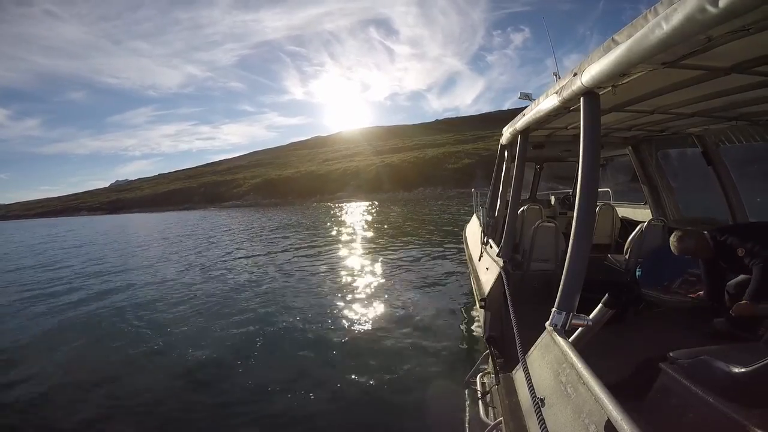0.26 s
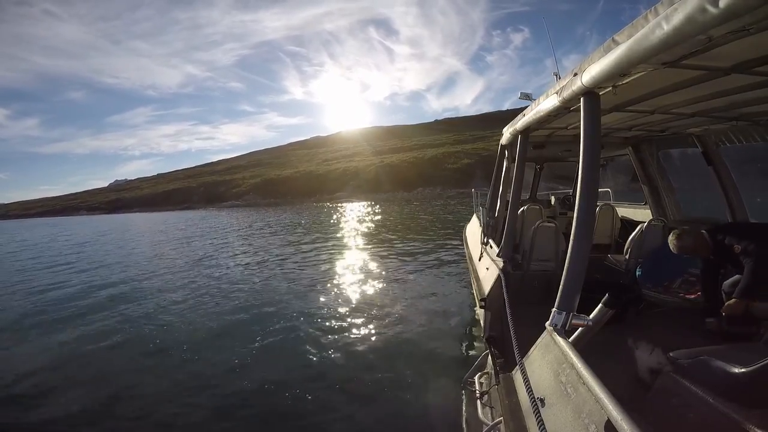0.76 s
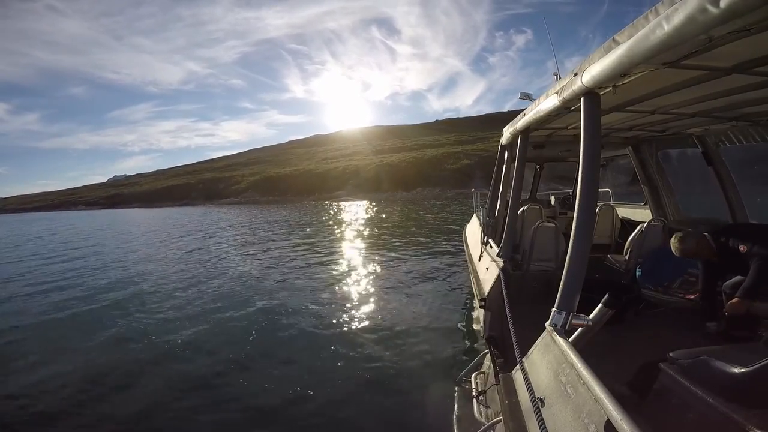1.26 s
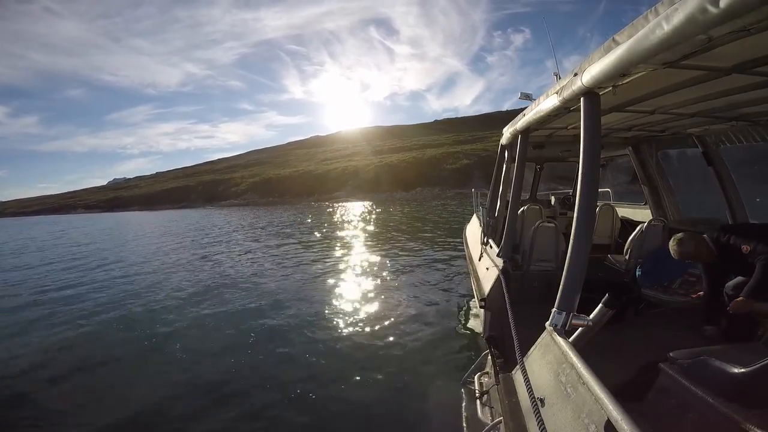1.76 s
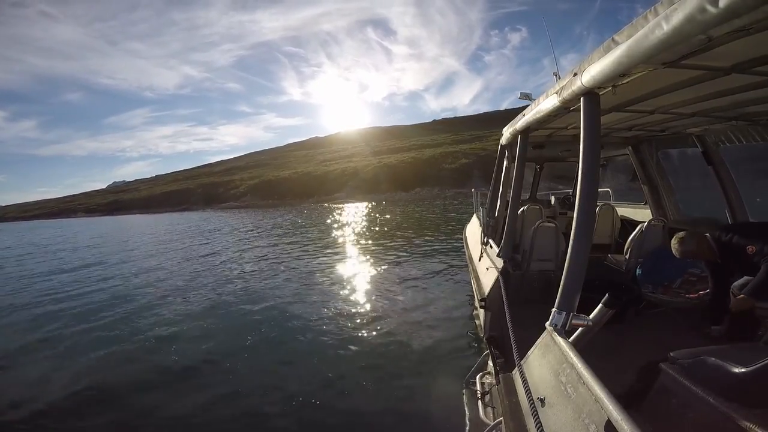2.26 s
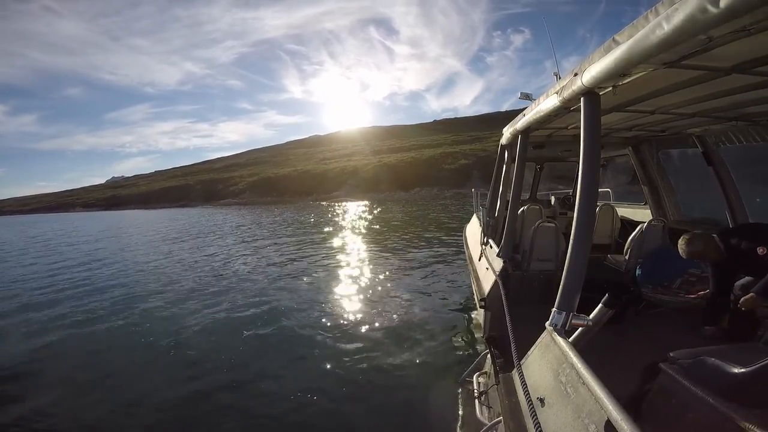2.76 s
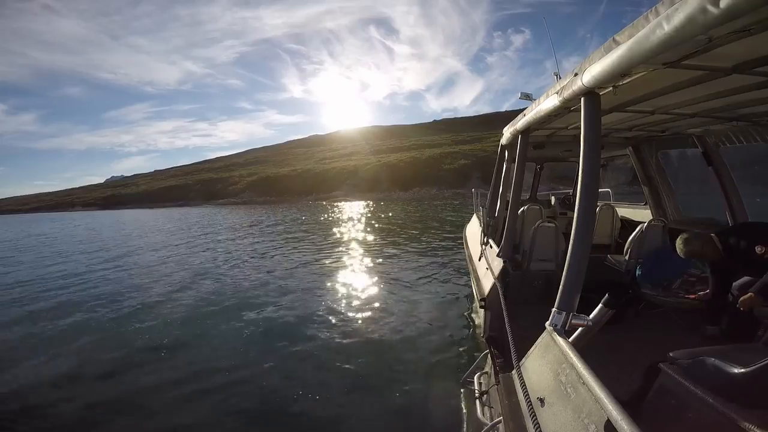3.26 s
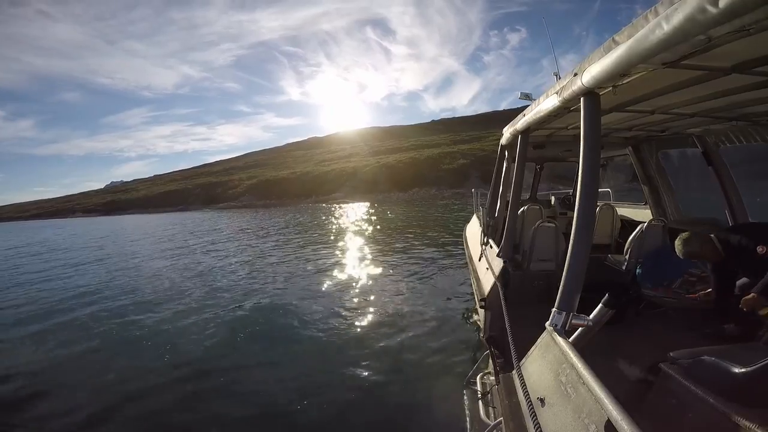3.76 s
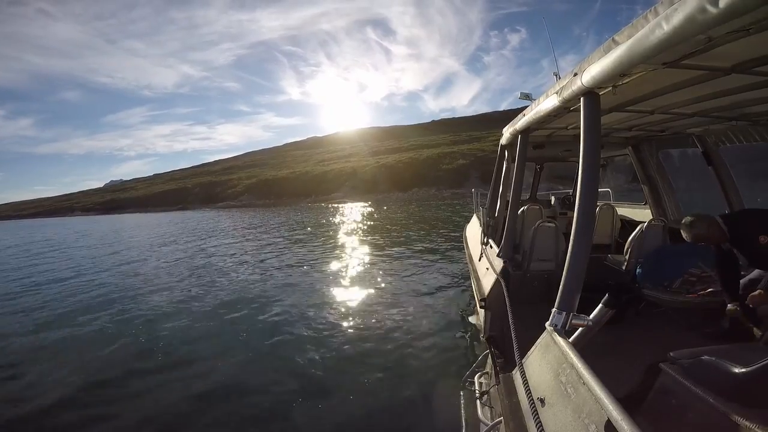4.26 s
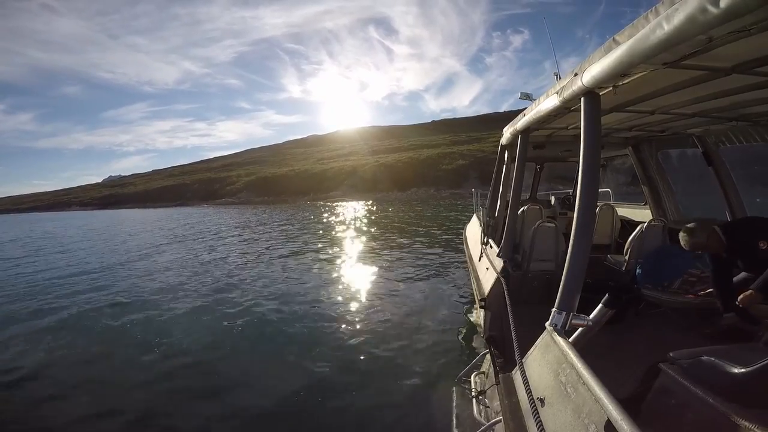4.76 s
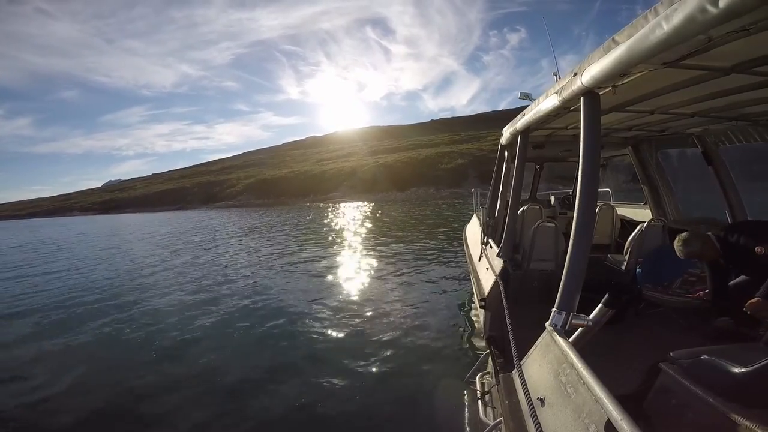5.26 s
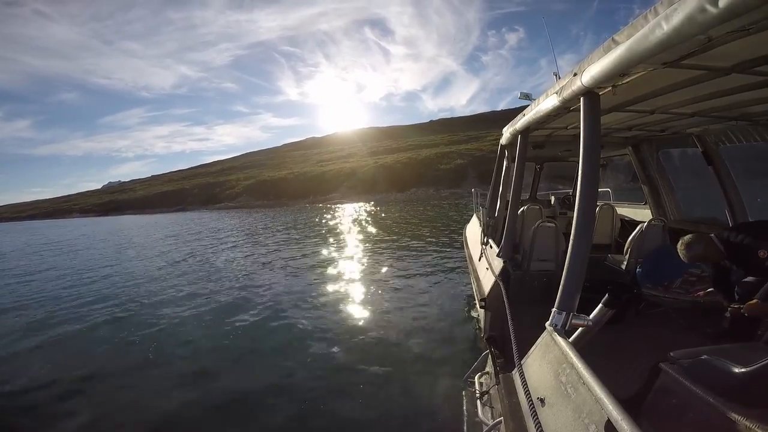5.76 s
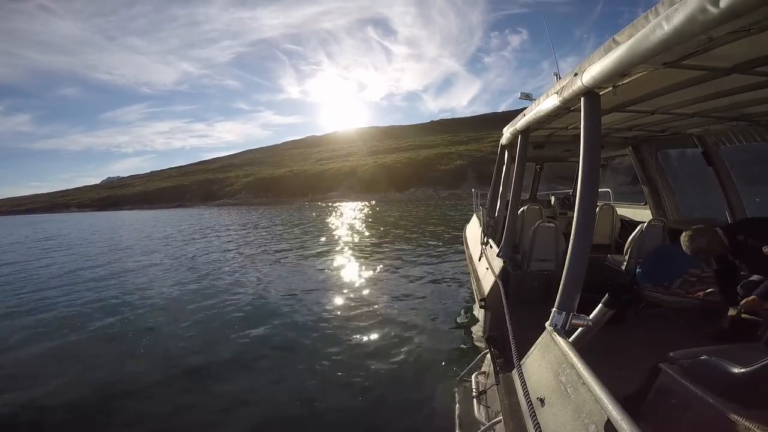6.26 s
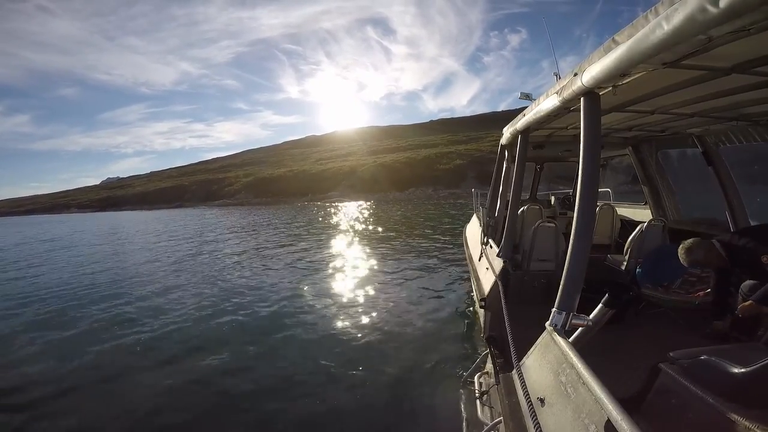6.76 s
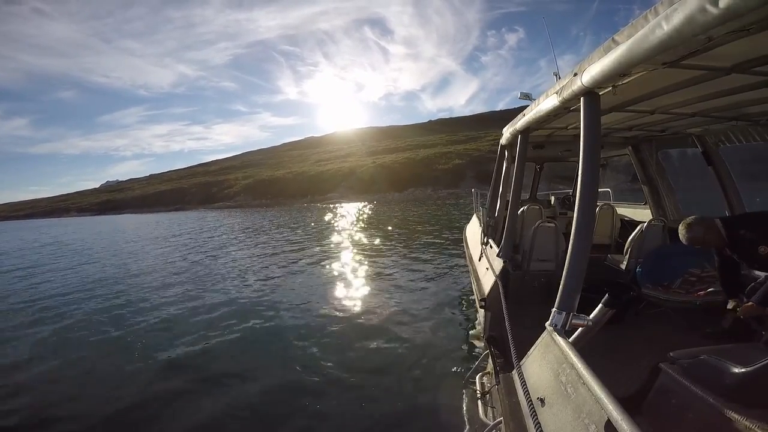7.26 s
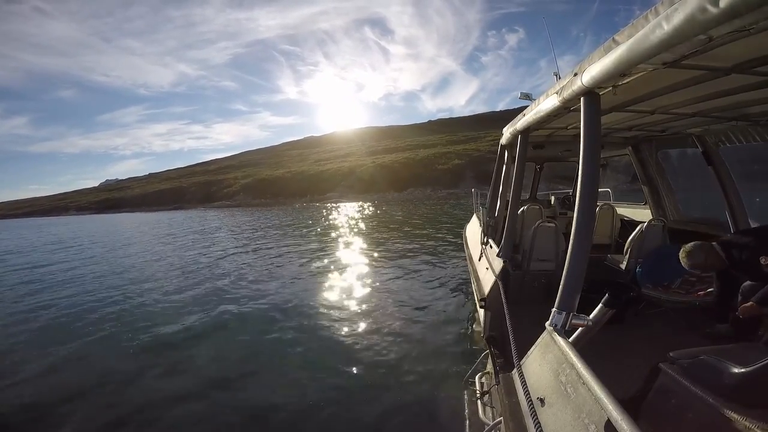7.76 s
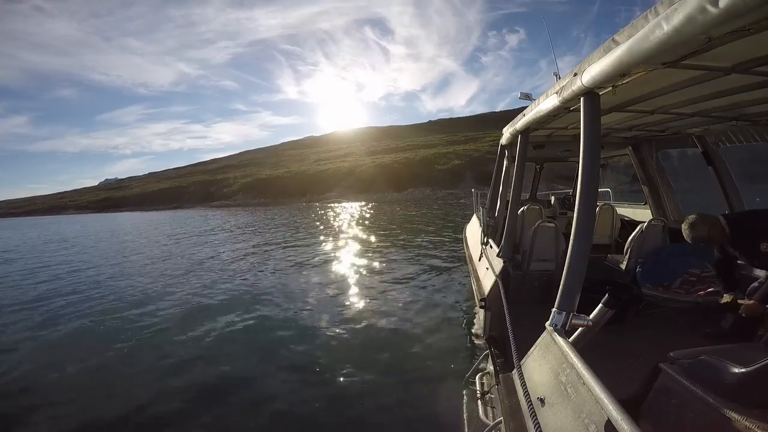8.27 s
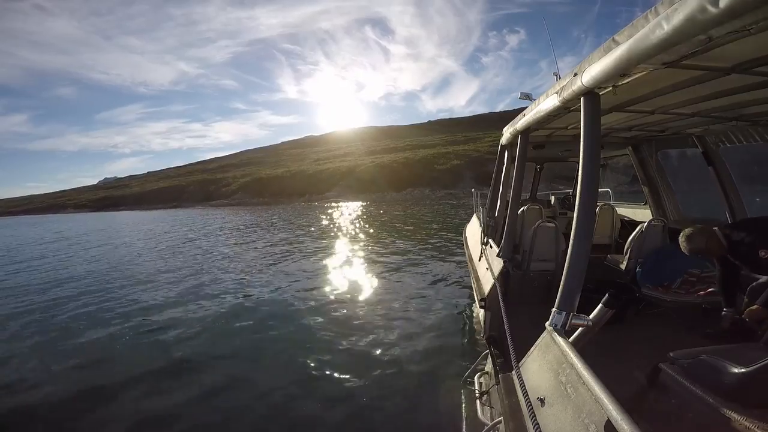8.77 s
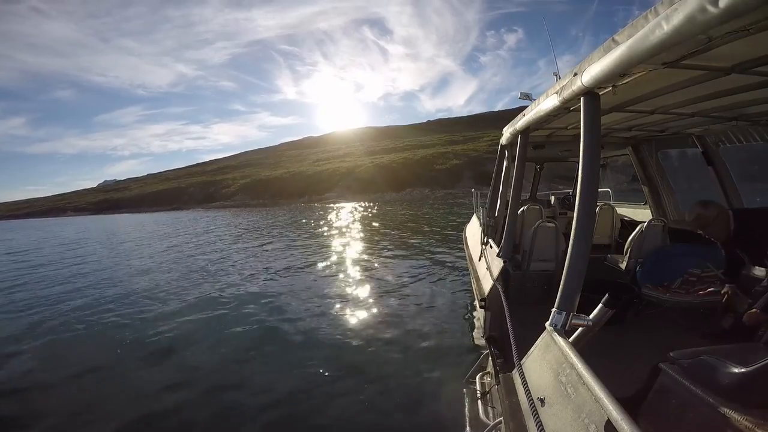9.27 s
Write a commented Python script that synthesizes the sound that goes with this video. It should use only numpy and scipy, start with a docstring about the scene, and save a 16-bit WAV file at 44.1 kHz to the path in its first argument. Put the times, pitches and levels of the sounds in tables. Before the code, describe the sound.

Someone shifts heavy gear aboard a drifting metal boat: scuffs, booming knocks and sharp clanks, with low rumble and soft lapping water.

```python
"""A low boom and a soft bed of water open the scene, with a scuff on deck and then a heavy thud.
An aluminium boat drifts on calm water while someone shifts things about: hard objects clack on the
plating, and heavy ones thud and ring the hollow hull. Wavelets and ripples plop under the side, and
rocking swings the lowest hull mode. Blows are shaped noise plus decaying sines, sent through the
plating's resonances; the boom is a wavering sine in a dull rumble, and the bed is coloured noise."""
import sys
import numpy as np
from scipy import signal
from scipy.fft import irfft, next_fast_len
from scipy.io import wavfile
from scipy.ndimage import uniform_filter1d

SR = 44100
rng = np.random.default_rng(int(sys.argv[2]) if len(sys.argv) > 2 else 0)


def digitize_waveform(pressure):
    """Quantize a signal to 16-bit integers and store it at the path in sys.argv[1].

    Rows of a 2-D input are taken as channels; values are limited to [-1, 1].
    """
    field = np.atleast_2d(pressure).T
    bounded = np.clip(field, -1, 1)
    quanta = np.round(bounded * 32767).astype(np.int16)
    wavfile.write(sys.argv[1], SR, quanta)


N = 420273
T = np.arange(N) / SR
# time since a blow (s); it starts below zero because contact may press a little early
AGE = T[:SR * 3 // 2] - .05

# heavy loads landing on the hull, levels before each layer's gain:
# t/s, burst level/dB, deep ring level/dB, scuff level/dB
LANDINGS = [(0.054, -16, -31, -8), (0.226, -8, -20, -13), (1.175, -24, -35.5, -33),
            (1.638, -25.5, -47, -25.5), (1.684, -14.5, -23.5, -24), (1.781, -12, -18, -24),
            (2.175, -23, -31, -29), (2.357, -29.5, -31, -24), (2.708, -9.5, -23, -13),
            (2.813, -26, -26, -28.5), (3.152, -18, -21.5, -27), (3.672, -35, -37.5, -36.5),
            (3.789, -40.5, -32.5, -38), (3.978, -16.5, -25.5, -25.5), (5.393, -32, -35.5, -34),
            (5.542, -13.5, -23.5, -24), (6.396, -15, -23, -26.5), (7.198, -25.5, -35.5, -31.5),
            (8.675, -35, -42, -36), (8.986, -15, -26.5, -20.5)]
LANDING_TYPICAL_DB = (-25, -41.5, -52)  # a typical landing scuff: middle, treble, top


def from_db(db):
    """Decibels to amplitude gain."""
    return 10 ** (np.asarray(db) / 20)


def rms_one(x):
    """Scale to unit rms."""
    return x / np.sqrt(np.mean(x ** 2) + 1e-20)


def at_hz(points, hz):
    """Read a table on a log-frequency axis."""
    f, value = np.transpose(points)
    return np.interp(np.log(hz + 1e-9), np.log(f), value)


def add(out, s, sound):
    """Mix in a blow that lands at time s, keeping its early pressing ahead of it."""
    i = int(min((s + AGE[0]) * SR, N - 1))
    out[max(i, 0):i + len(sound)] += sound[max(-i, 0):N - i]


def noise(spectrum, size):
    """Noise of a given colour: set magnitudes with random phases, rms 1."""
    hz = np.fft.rfftfreq(size, 1 / SR)
    random_phase = np.exp(2j * np.pi * rng.random(len(hz)))
    return rms_one(irfft(from_db(at_hz(spectrum, hz)) * random_phase, size))


def drift(rate):
    """Slow random wandering of rms 1: noise averaged twice over about 1/rate seconds."""
    step = 100  # samples between the slow points
    width = int(SR / rate / step) + 1
    slow = rng.standard_normal(N // step + 2)
    slow = uniform_filter1d(uniform_filter1d(slow, width), width)
    return np.interp(np.arange(N) / step, np.arange(len(slow)), rms_one(slow))


def swell(rise, t60):
    """Contact builds up over the rise time, then the vibration dies away by 60 dB per t60."""
    contact = .5 * (1 + np.tanh(AGE / max(rise, 1e-4)))
    decay = np.exp(-np.log(1000) * np.maximum(AGE, 0) / max(t60, 1e-2))
    return contact * decay


def burst(carrier, envelope):
    """Many crowded modes ringing under one envelope, with the envelope's own energy."""
    sound = carrier * envelope
    return sound * np.sqrt(np.sum(envelope ** 2) / np.sum(sound ** 2))


def plating(x):
    """Whatever shakes the plating takes on its ringing resonances, one after another."""
    # resonances of the plating: f/Hz, width/Hz, lift/dB
    resonances = [(615, 35, 4), (709, 30, 8), (925, 45, 4), (1094, 75, 7), (1461, 45, 7), (1600, 45, 5),
                  (1774, 35, 8), (2355, 130, 8), (2870, 90, 4), (4244, 80, 7), (4397, 70, 8),
                  (5600, 180, 9), (7000, 350, 5), (10400, 400, 6)]
    for hz, width, lift_db in resonances:
        ring = signal.lfilter(*signal.iirpeak(hz, hz / width, fs=SR), x + 1e-18)
        x = x + (from_db(lift_db) - 1) * ring
    return x


def ambience(level_db=-54, lapping_db=-68, sway_db=3.5):
    """A soft bed of water and air, lapping heard through the plating, and a thin electronic whine."""
    # water and air around the boat: f/Hz, relative level/dB per Hz
    bed_colour = [(35, -41), (60, -24), (74, -21.5), (187, -18), (206, -33.5), (242, -21.5), (368, -38.5),
                  (403, -35), (453, -40), (1120, -46), (1520, -46), (6120, -52.5), (15500, -68.5)]
    # water washing along the side, ahead of the plating: f/Hz, relative level/dB per Hz
    lapping_colour = [(150, -1), (270, 14), (450, -2.5), (700, -3), (1100, 0), (2300, -7), (5000, -16.5)]
    # faint electronic whine: centre f/Hz, rms level/dB
    whine_tones = [(6310, -83), (12620, -84)]
    bed = from_db(level_db) * noise(bed_colour, next_fast_len(N))[:N]
    wash = plating(noise(lapping_colour, next_fast_len(N))[:N])
    lapping = from_db(lapping_db + sway_db * drift(5)) * wash
    whine = 0
    for hz, db in whine_tones:
        phase = 2 * np.pi * np.cumsum(hz + 12 * drift(15)) / SR  # pitch wanders by 12 Hz rms
        whine = whine + np.sqrt(2) * from_db(db) * np.sin(phase)
    return bed + lapping + whine


def rocking():
    """Swing of the lowest mode: surges rise, hold and die back to a rest level that sags in lulls."""
    # rocking surges: t/s, level/dB, hold/s
    surges = [(0.05, -19.5, 0.17), (0.379, -21.5, .14), (1.675, -20.5, 0.77), (2.83, -23.5, 0.18),
              (3.79, -29, 0.073), (5.431, -19, 0.12), (6.49, -27, 0.054), (6.94, -27.5, 0.41),
              (9.115, -23, 0.38)]
    # lulls, when the lowest mode all but stops: centre t/s, half-length/s
    lulls = [(1.073, 0.049), (4.587, 0.22), (5.36, 0.044), (6.3, 0.14), (8.118, 0.1)]
    rest_db, lull_db = -34.5, -8
    surge_rise_s, surge_fall_db_per_s = 0.024, 72
    calm = sum(np.exp(-((T - s) / half) ** 2) for s, half in lulls)
    power = from_db(rest_db + lull_db * calm) ** 2
    for s, level_db, hold in surges:
        rise = .5 * (1 + np.tanh((T - s) / surge_rise_s))
        fall_db = surge_fall_db_per_s * np.maximum(T - s - hold, 0)
        power = power + (rise * from_db(level_db - fall_db)) ** 2
    return np.sqrt(power)


def boom(gain_db=0, waver_hz=0.9, flutter_db=1.1, rumble_db=-18):
    """The rocking keeps the lowest hull mode swinging, wrapped in a dull rumble."""
    # dull rumble around the lowest mode: f/Hz, relative level/dB per Hz
    rumble_colour = [(15, -20), (28, -14), (43, -9.5), (62, 0), (80, -16), (130, -33.5), (400, -68)]
    boom_hz = 43.1
    phase = 2 * np.pi * np.cumsum(boom_hz + waver_hz * drift(12.8)) / SR
    mode = np.sqrt(2) * from_db(flutter_db * drift(19)) * np.sin(phase)
    rumble = from_db(rumble_db) * noise(rumble_colour, next_fast_len(N))[:N]
    return from_db(gain_db) * rocking() * (mode + rumble)


def pocket(hz, t60=0.069, tail_db=-25, tail_t60=0.38):
    """A pocket of air squeezed between water and metal gives a short hollow plop."""
    # colour of a trapped air pocket: f/multiple of its pitch, relative level/dB per Hz
    pocket_colour = [(.12, -21), (.5, -8.5), (.8, -3), (1.099, 0.5), (1.4, -12.5), (1.75, -19.5),
                     (2.1, -28.5), (2.45, -24), (3.8, -58.5)]
    colour = np.array(pocket_colour) * [hz, 1]
    envelope = swell(.0012, t60) + from_db(tail_db) * swell(0.0064, tail_t60)
    return burst(noise(colour, len(AGE)), envelope)


def ripples(level_db=-68, per_s=24, spread_db=4.0, count=12):
    """Small ripples plop softly at random, each place along the hull at its own pitch."""
    out = 0
    for hz in np.geomspace(180, 1500, count):
        strength = from_db(spread_db * rng.uniform(-0.9, 1, N))
        ticks = (rng.random(N) < per_s / count / SR) * strength
        out = out + signal.oaconvolve(ticks, pocket(hz, t60=.12) / np.sqrt(hz))[:N]
    return from_db(level_db) * rms_one(out)


def by_force(rows, typical_db, follows):
    """Harder contacts lift middle, treble and top, each by its own share of the extra decibels."""
    typical, share = np.array(typical_db), np.array(follows)
    return [(s, *(typical + share * (level - typical_db[0]))) for s, level in rows]


def hull_ring(body_db, deep_db, rise=.006, scatter_db=1.62, detune=0.0077):
    """One blow rings the hull modes; the load on the plates shifts them a little each time."""
    # hull modes: nominal f/Hz, relative level/dB, t60/s
    hull_modes = [(86.65, -8, 0.98), (118.23, -3, 0.75), (152.43, -2, 0.9), (170.5, 3, .3),
                  (203, -3.5, 0.28), (237.7, 3.5, 0.29), (253.3, 0.5, 0.4), (304.6, -5, 0.33),
                  (321.3, -5, 0.14), (410, -16.5, 0.26), (501, -24.5, 0.24)]
    out = 0
    for hz, mode_db, t60 in hull_modes:
        # deep level below 160 Hz, body level above 220 Hz
        level_db = np.interp(hz, [160, 220], [deep_db, body_db])
        level_db = level_db + mode_db + scatter_db * rng.standard_normal()
        pitch = hz * (1 + detune * rng.standard_normal())
        tone = np.sin(2 * np.pi * (pitch * AGE + rng.random()))
        out = out + from_db(level_db) * swell(rise, t60) * tone
    return out


def partials(low_hz=900, high_hz=4500, t60=0.084, count=4):
    """The object itself rings briefly with a few notes that depend on where it is hit."""
    pitch, phase = rng.random((2, count, 1))
    hz = low_hz * (high_hz / low_hz) ** pitch
    notes = low_hz / hz * np.sin(2 * np.pi * (hz * AGE + phase))
    return swell(0.0024, t60) * np.sum(notes, axis=0)


def contacts(rows, rise, gain_db, treble_db, top_db, crack_db, crack_t60, tail_db, tail_t60,
             hull_db, rattle_db, object_db):
    """A short crack, the rattling wash of crowded plate modes, and a faint long ring below the treble."""
    # colour of a contact, ahead of its force: f/Hz, band level/dB
    contact_colour = [(200, 5), (330, -9.5), (460, -18), (650, -10.5), (1300, -6.5), (2000, -12.5),
                      (3000, 1.5), (4500, -4), (6500, -3.5), (8500, -2), (12000, -8.5), (15500, 6.5)]
    # decay of the wash: f/Hz, t60/s
    contact_decay = [(250, 0.53), (700, 0.16), (1800, 0.27), (5000, 0.23), (13000, 0.19)]
    out, edges = np.zeros(N), np.geomspace(200, 16000, 14)
    centres = np.sqrt(edges[1:] * edges[:-1])
    bands, fades = [], []
    for low, high, hz in zip(edges, edges[1:], centres):
        band_filter = signal.butter(2, (low, high), "band", fs=SR, output="sos")
        bands.append(signal.sosfilt(band_filter, rng.standard_normal(N)))
        wash = swell(rise, at_hz(contact_decay, hz))
        crack = from_db(crack_db) * swell(rise, crack_t60)
        tail = from_db(tail_db) / (1 + (hz / 3500) ** 2) * swell(rise, tail_t60)
        fades.append(wash + crack + tail)
    rattle = from_db(rattle_db * np.clip(drift(250), -2, 2))
    for s, mid, treble, top in rows:
        hardness = [(1700, mid), (3500, treble + treble_db), (6000, treble + treble_db),
                    (9000, top + top_db)]  # f/Hz, level/dB
        gains = from_db(gain_db + at_hz(hardness, centres) + at_hz(contact_colour, centres))
        # every contact takes a fresh stretch of the band noise
        start = rng.integers(0, N - len(AGE))
        part = slice(start, start + len(AGE))
        add(out, s, sum(g * burst(band[part] * rattle[part], fade)
                        for g, band, fade in zip(gains, bands, fades)))
        ring = hull_ring(mid + hull_db, mid + hull_db + 1.5, rise=0.014)
        add(out, s, ring + from_db(mid + object_db) * partials())
    return out


def scuffs():
    """Yielding loads brush the deck, on their own or just before their weight arrives."""
    # things shifted lightly across the deck: t/s, level/dB before the contact gains
    deck_shifts = [(0.001, -26), (1.042, -32), (1.127, -32), (1.505, -38), (1.811, -21), (5.509, -26.5),
                   (6.256, -42), (6.354, -27.5), (7.065, -46.5), (7.173, -38)]
    lead_s = .012  # brushing comes this long before the listed landing time
    brushes = [(s - lead_s, scuff) for s, _, _, scuff in LANDINGS]
    landings = by_force(brushes, LANDING_TYPICAL_DB, follows=(1, 1.3, 0.95))
    shifts = by_force(deck_shifts, typical_db=(-32.5, -44.5, -50), follows=(1, 0.7, .8))
    return contacts(landings + shifts, rise=0.0082, gain_db=-13, treble_db=1.5, top_db=0.5,
                    crack_db=-6.0, crack_t60=0.031, tail_db=-22.0, tail_t60=0.72,
                    hull_db=-14, rattle_db=1.5, object_db=-15)


def thuds(burst_db=-5, burst_t60=0.23, rise=0.011, body_db=-5, deep_db=1,
          clatter_db=-6, clatter_t60=0.066, lag=.003):
    """A heavy blow: a dull burst with some clatter, which settles into the hull's hollow ring."""
    # colour of the dense first burst: f/Hz, relative level/dB per Hz
    dull_colour = [(50, -26), (110, -7), (170, -10.5), (250, -5.5), (320, -12.5), (450, -60.5),
                   (700, -31.5), (2500, -65.5)]
    # colour of the clatter that comes with it: f/Hz, relative level/dB per Hz
    loose_colour = [(200, -11), (450, -20.5), (650, 7), (1100, -7), (2000, -12), (5000, -9), (12000, -59)]
    clatter_typical_db, clatter_follows = -37.5, 1.47
    out = np.zeros(N)
    for s, level, deep, scuff in LANDINGS:
        # loose gear rattles more the rougher the landing
        clatter = clatter_typical_db + clatter_follows * (scuff - LANDING_TYPICAL_DB[0])
        dull = burst(noise(dull_colour, len(AGE)), swell(rise, burst_t60))
        loose = burst(noise(loose_colour, len(AGE)), swell(rise, clatter_t60))
        blow = from_db(level + burst_db) * dull + from_db(clatter + clatter_db) * loose
        add(out, s + lag, blow + hull_ring(level + body_db, deep + deep_db, rise))
    return out


def clacks():
    """Hard objects hit all at once, so the contact rises fast and the treble cracks."""
    # hard objects striking the plating: t/s, level/dB before the contact gains
    hard_hits = [(0.218, -15.5), (0.839, -20), (1.338, -23), (1.765, -8), (2.306, -25.5), (2.699, -9),
                 (2.785, -14.5), (3.3, -20), (3.761, -33.5), (3.958, -20), (4.614, -21), (5.152, -22.5),
                 (6.016, -24), (6.836, -22.5), (7.74, -22.5), (8.579, -20)]
    hits = by_force(hard_hits, typical_db=(-22, -35.5, -42), follows=(0.88, 0.82, 0.6))
    return contacts(hits, rise=0.0015, gain_db=-13.5, treble_db=2.5, top_db=4.0,
                    crack_db=-3.5, crack_t60=0.0093, tail_db=-28.0, tail_t60=0.65,
                    hull_db=-19.5, rattle_db=1.0, object_db=-14.0)


def slaps(gain_db=-6, hull_db=-12.5, lag=0.001):
    """Wavelets trap air against the side, plop and nudge the hull."""
    # wavelets under the side: t/s, level/dB before the gains, pocket pitch f/Hz
    wavelets = [(0.468, -42, 1480), (0.529, -38, 1590), (0.543, -32.5, 1420), (0.641, -44, 1670),
                (0.708, -45, 1110), (0.915, -33, 870), (1.272, -19, 990), (1.445, -18.5, 950),
                (1.606, -37, 700), (1.734, -17, 1030), (1.964, -40, 756), (2.09, -25, 1590),
                (2.135, -35, 1600), (4.782, -45.5, 694), (4.991, -53, 740), (5.234, -36, 720),
                (5.806, -48.5, 590), (7.376, -49.5, 770), (8.325, -51.5, 600), (8.613, -26, 1040),
                (9.274, -20, 997)]
    middle_hz, push_db_per_octave = 1010, -20  # big, low pockets push the hull harder
    out = np.zeros(N)
    for s, level, hz in wavelets:
        push_db = level + hull_db + push_db_per_octave * np.log2(hz / middle_hz)
        plop = from_db(level + gain_db) * pocket(hz)
        add(out, s + lag, plop + hull_ring(push_db, push_db, rise=0.00044))
    return out


def scene():
    """All blows and plops reach the ear through the plating; boom and ambience join them."""
    struck = scuffs() + thuds() + clacks() + slaps() + ripples()
    return (plating(struck) + boom() + ambience())[None]


def record(dry):
    """The microphone channel cuts the top steeply above 15.5 kHz."""
    steep_cut = signal.ellip(10, .1, 80, 15500, fs=SR, output="sos")
    return signal.sosfilt(steep_cut, dry)


dry = scene()
out = record(dry)
digitize_waveform(out)
```